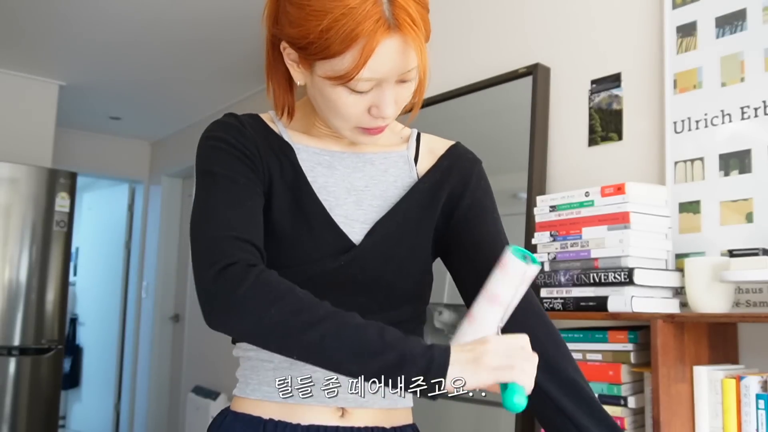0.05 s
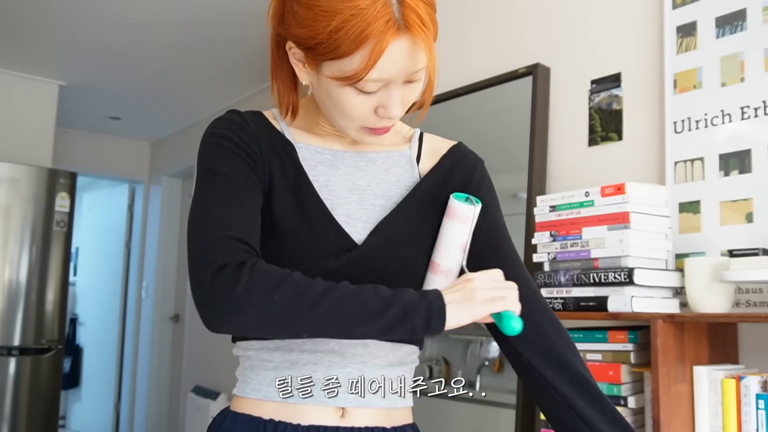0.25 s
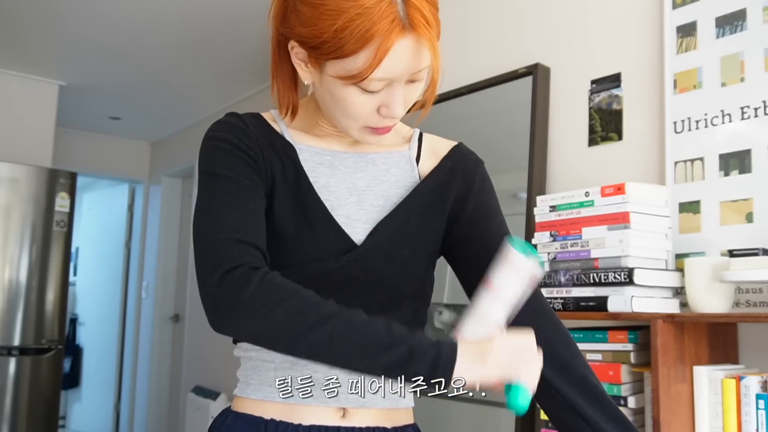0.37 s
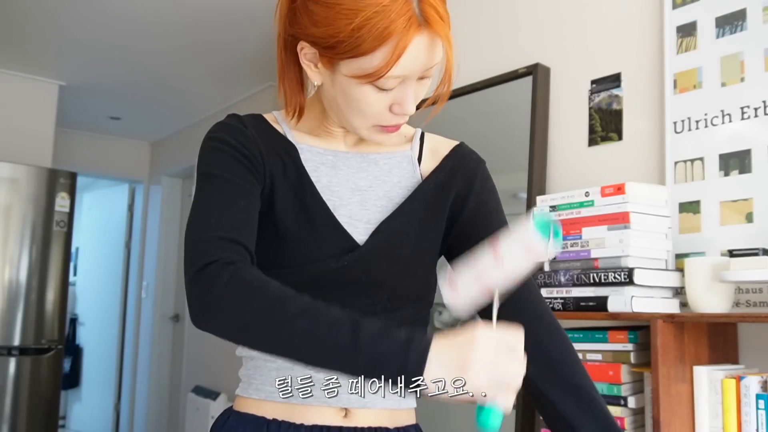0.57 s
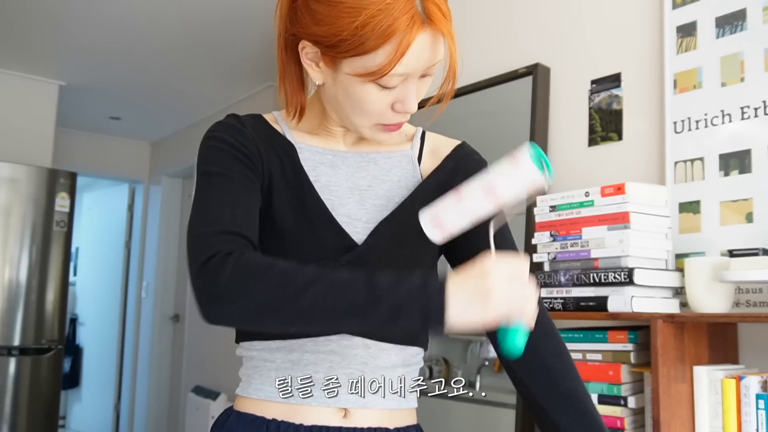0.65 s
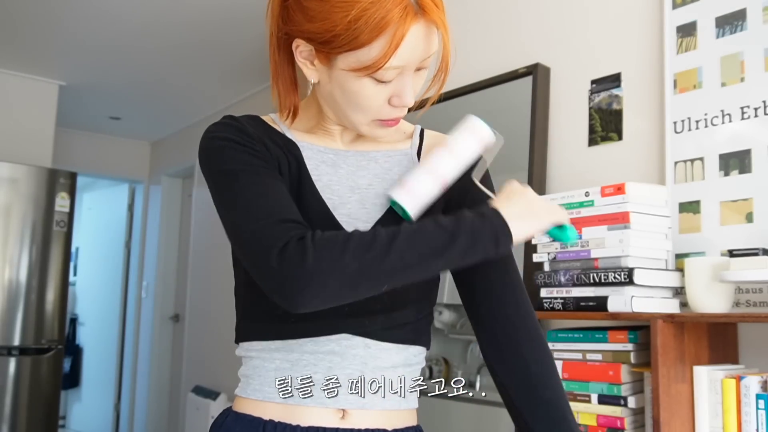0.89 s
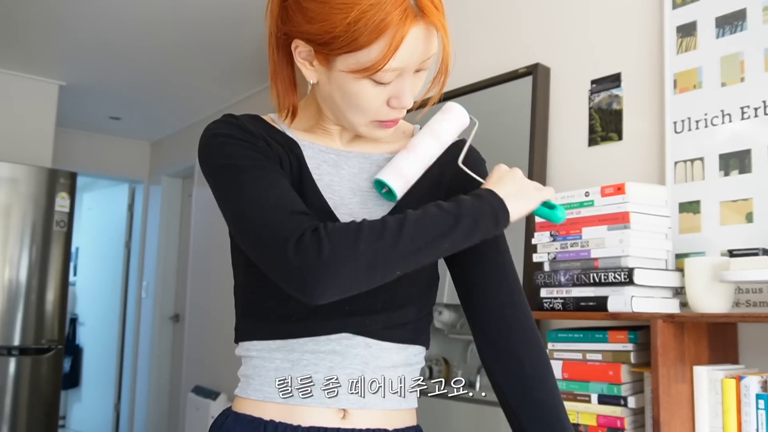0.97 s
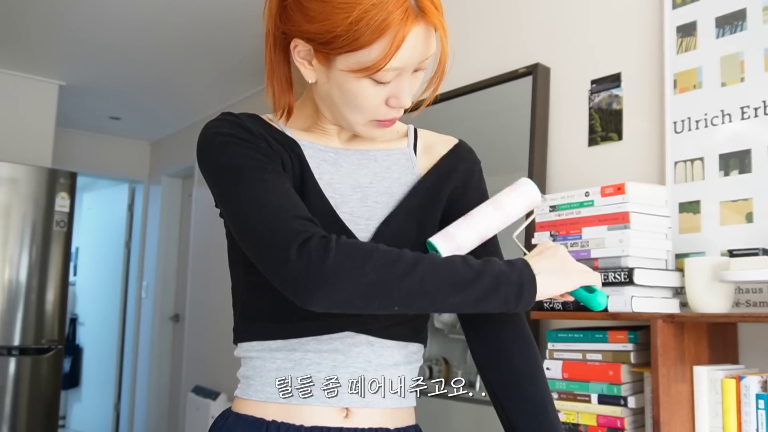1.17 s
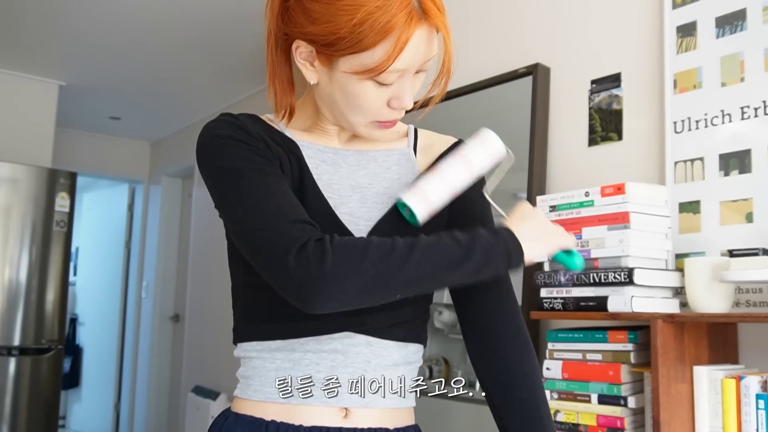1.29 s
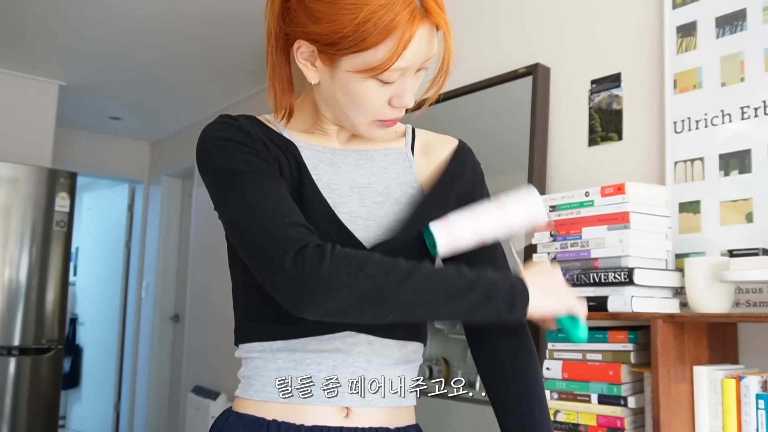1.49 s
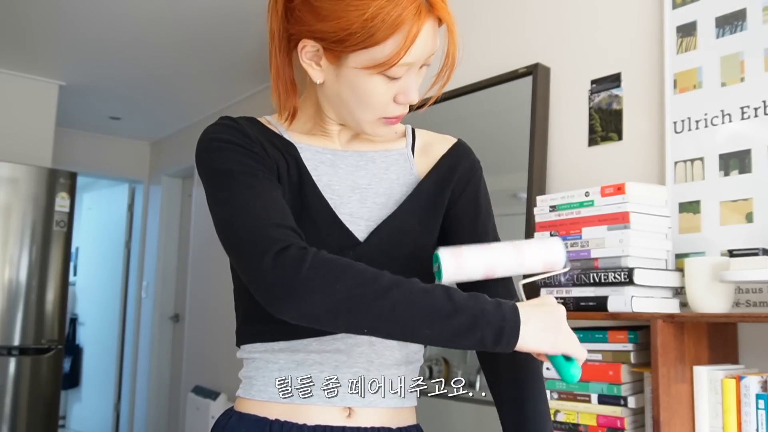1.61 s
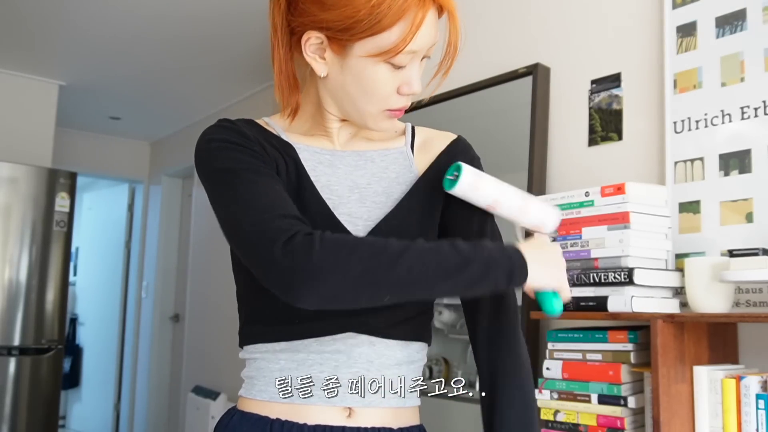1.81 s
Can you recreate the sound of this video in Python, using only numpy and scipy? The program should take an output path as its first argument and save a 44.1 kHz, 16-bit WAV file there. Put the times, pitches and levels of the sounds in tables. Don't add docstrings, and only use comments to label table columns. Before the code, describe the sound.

A lint roller strokes a knitted sleeve, its adhesive crackling softly from 0 to 0.55 seconds, with hollow knocks strongest near 0.5. A bright snap at 0.66 and a hollow landing at 0.78 are loudest, with rattling and thin wire ringing. Softer peeling strokes follow from 0.9 to 1.7, with a clack and ting around 1.35-1.4, then a snap at 1.83. Close, quiet room, low steady hum.

```python
import sys
import numpy as np
from scipy import signal
from scipy.fft import rfft, irfft
from scipy.io import wavfile
from scipy.ndimage import uniform_filter1d

SR = 44100
rng = np.random.default_rng(int(sys.argv[2]) if len(sys.argv) > 2 else 0)


def gain_from_db(level_db):
    decades = np.asarray(level_db, float) / 20
    return 10 ** decades


def waveform_to_disk(signal):
    frames = np.transpose(np.atleast_2d(signal))
    scaled = np.clip(frames, -1, 1) * 32767
    samples = np.round(scaled).astype(np.int16)
    wavfile.write(sys.argv[1], SR, samples)


N = 81585
TIME = np.arange(N) / SR
HZ = np.fft.rfftfreq(N, 1 / SR)

# frequency in Hz, likeness from 0 to 1.
SIDES_ALIKE = [(30, 0.96), (100, 0.914), (1000, 0.772), (2500, 1), (5000, 1), (7000, 0.863), (10000, 0.83),
               (15000, 0.326)]


def evened(x):
    return x / np.sqrt(np.mean(x ** 2) + 1e-20)


def read(points, hz):
    f, value = np.transpose(points)
    return np.interp(np.log(hz + 1), np.log(f + 1), value)


def swell(peak, rise, fall):
    return np.exp(-((TIME - peak) / np.where(TIME < peak, rise, fall)) ** 2)


def resonate(x, hz, width):
    r = np.exp(-np.pi * width / SR)
    gain = (1 - r * r) / 2
    return signal.lfilter([gain, 0, -gain], [1, -2 * r * np.cos(2 * np.pi * hz / SR), r * r], x)


def clicks(per_s, spread_db):
    size = gain_from_db(spread_db * np.minimum(rng.exponential(1, N), 4))
    size = size * rng.choice([-1., 1.], N)
    return evened(size * (rng.random(N) < per_s / SR))


def slow(count):
    once = uniform_filter1d(rng.standard_normal(N), count)
    return evened(uniform_filter1d(once, count))


def pair(a, b, likeness=SIDES_ALIKE):
    same = np.clip(read(likeness, HZ), -1, 1)
    mid = rfft(a) * np.sqrt((1 + same) / 2)
    side = rfft(b) * np.sqrt((1 - same) / 2)
    return irfft(np.array([mid + side, mid - side]), N)


def hum():
    # frequency in Hz, level in dB per Hz.
    hum_colour = [(15, -56), (25, -17), (211, 2), (619, -12.5), (980, -6.5), (1150, -8), (7410, -16.5),
                  (8480, -20.5), (15800, -51)]
    noise = pair(*rng.standard_normal((2, N)))
    return gain_from_db(-54.5) * evened(irfft(rfft(noise) * gain_from_db(read(hum_colour, HZ)), N))


def room(x):
    # frequency in Hz, time to fall by 60 dB in seconds.
    fading = [(200, 0.124), (1000, 0.83), (4000, 0.254), (12000, 0.95)]
    # frequency in Hz, left-right likeness of the echoes.
    echoes_alike = [(300, 0.38), (1500, 0.95), (3000, 0.47), (6000, 0.07)]
    taps = np.zeros((2, 22000))
    at = np.arange(200, 21980, 20) + rng.integers(0, 20, (2, 1089))
    np.put_along_axis(taps, at, rng.choice([-1., 1.], at.shape), 1)
    hz, t, z = signal.stft(taps, SR, nperseg=256)
    decay = gain_from_db(-60 * t / read(fading, hz)[:, None])
    tail = signal.istft(z * decay, SR, nperseg=256)[1]
    tail = tail / np.linalg.norm(tail[0])
    echoes = signal.fftconvolve(x[None], tail, axes=1)[:, :N]
    return pair(*echoes, echoes_alike)


def rubbed_power(s, held, t60):
    rub_s, damped_t60_s = 0.003, 0.05
    at = slice(round(s * SR), round((s + .3) * SR))
    since = np.maximum(TIME[at] - s, 0)
    let_go = np.maximum(since - held, 0)
    power = np.zeros(N)
    power[at] = (1 - np.exp(-since / rub_s)) ** 2 * gain_from_db(-120 * (since / t60 + let_go / damped_t60_s))
    return power


def wire():
    wire_pitches = [4582, 4535, 4662, 8020, 8185, 11580, 13270, 13600, 14640, 15700]
    # level in dB, time to fall by 60 dB in seconds, left lead in radians.
    wire_tones = [(2.5, 0.8, 0.5), (-15, 0.17, .6), (-11, 0.26, 0.87), (-2, .25, 0.92), (1, 0.52, 0.91),
                  (0, .5, 1.3), (-3, .5, 1.1), (-2, .5, 1.1), (-5, .4, 1.3), (-2, .3, 1.5)]
    # start in seconds, held for seconds, level in dB, upper tones against the lowest in dB.
    touches = [(.39, 0.061, -54, 11.5), (0.441, 0.033, -46, 3.5), (0.483, 0.008, -38.5, 0),
               (0.502, 0.0089, -55, 20.5), (0.515, 0.013, -36.5, -4), (.536, 0.021, -44.5, -1),
               (.57, 0.0406, -55, 2), (.628, 0.025, -63.5, 8.5), (0.681, .04, -55.5, 13.5),
               (.705, 0.072, -47.5, -12), (0.767, 0.0069, -32, 0.5), (0.785, 0.023, -30.5, -3.5),
               (.815, 0.03, -48, 3), (0.842, 0.033, -37, -5), (.89, 0.01, -63, 17), (.905, 0.027, -57, -6),
               (0.991, .03, -64, 17.5), (1.026, 0.018, -50.5, -0.5), (1.05, 0.07, -61, 20),
               (1.07, 0.043, -50, -2), (1.115, 0.053, -58, 17.5), (1.128, 0.0375, -44, 5.5),
               (1.152, 0.013, -47.5, 6.5), (1.163, 0.023, -34.5, -7.5), (1.19, 0.0135, -48, -6),
               (1.215, 0.039, -53, -1), (1.399, 0.062, -62, 17.5), (1.40, 0.023, -51, -7),
               (1.458, 0.0037, -48, -5), (1.477, 0.011, -48.5, 0), (1.50, .03, -61, 15),
               (1.699, 0.035, -64.5, 14), (1.735, 0.12, -79, 16)]
    # start in seconds, held for seconds, level in dB.
    hard_rubs = [
        (.50, 0.031, -54),
        (.53, .1, -58.5),
        (.685, 0.037, -69),
        (.768, .05, -49.5),
        (.82, .08, -57),
        (1.0, .04, -65),
        (1.06, 0.086, -71),
        (1.402, 0.032, -57),
        (1.44, .05, -67),
    ]
    waver_hz, waver_db, soft_db = 12, 1.5, 4
    out, sides = np.zeros((2, N)), np.array([[.5], [-.5]])
    for hz, (tone_db, t60, lead) in zip(wire_pitches, wire_tones):
        upper = hz > 6000
        rubs = [(s, held, db + upper_db * upper) for s, held, db, upper_db in touches]
        if hz > 11000:
            rubs = hard_rubs
        power = sum(gain_from_db(2 * db) * rubbed_power(s, held, t60) for s, held, db in rubs)
        drift = np.cumsum(waver_hz * hz / 4600 * slow(count=200)) / SR
        turns = hz * TIME + drift + rng.random()
        strength = np.sqrt(2 * power) * gain_from_db(tone_db - soft_db * upper + waver_db * slow(count=300))
        out += strength * np.sin(2 * np.pi * turns + lead * sides)
    return out


def end_cap():
    cap_pitches = [3885, 6750, 13500]
    # level in dB, second tone in dB, third tone in dB, time to fall by 60 dB in seconds.
    cap_levels = (-39, -7, -15, .4)
    start_s, held_s, beat_hz = 1.391, .045, 42
    db, second_db, third_db, t60 = cap_levels
    low, second, third = [np.sin(2 * np.pi * hz * TIME) for hz in cap_pitches]
    beat = 1 + .3 * np.cos(2 * np.pi * beat_hz * (TIME - start_s - .006))
    flutter = 1 + .5 * slow(count=100)
    cap = low * beat + gain_from_db(second_db) * second * flutter + gain_from_db(third_db) * third
    return gain_from_db(db) * np.sqrt(rubbed_power(start_s, held_s, t60)) * cap


def rattle():
    # peak in seconds, rise in seconds, fall in seconds, level in dB.
    spins = [
        (.49, 0.019, 0.12, -49.5),
        (0.698, 0.036, 0.015, -51),
        (0.792, 0.017, 0.041, -33.5),
        (.86, 0.0134, 0.023, -42.5),
        (1.202, 0.073, 0.027, -50.5),
        (1.358, 0.0066, 0.016, -42.5),
        (1.41, 0.032, 0.06, -52),
    ]
    # frequency in Hz, width in Hz, level in dB.
    roll_tones = [(724, 290, -4.5), (1084, 106, -8.5), (1270, 137, -1.5), (1710, 160, -2.5),
                  (1830, 370, -2.5), (2171, 170, -9), (2930, 300, -5), (5800, 370, -29.5)]
    taps = clicks(per_s=800, spread_db=3.0) + .5 * rng.standard_normal(N)
    body = sum(gain_from_db(db) * resonate(resonate(taps, hz, 4 * w), hz, w) / np.sqrt(w) for hz, w, db in roll_tones)
    return evened(body) * sum(gain_from_db(db) * swell(peak, rise, fall) for peak, rise, fall, db in spins)


def strike(hits, shell, octaves, bounce_db):
    # frequency in Hz, width in Hz, level in dB.
    arm_tones = [(227, 230, 0.5), (406, 223, 3), (530, 450, 3)]
    bounce_s, shiver_t60_s = 0.0034, 0.3
    out, t = np.zeros(N), np.arange(12000) / SR
    tap = 1. * (t == 0)
    thud = sum(gain_from_db(d) * evened(resonate(resonate(tap, f, w), f, w)) for f, w, d in arm_tones)
    thud = thud / abs(thud).max()
    later = np.maximum(t - bounce_s, 0)
    bounce = (later / 0.00205) * np.exp(1 - later / 0.00085) + 2.1 * np.exp(-t / 0.0025)
    for s, db, hz, thud_db, shiver_db in hits:
        tick = np.exp(-t / 0.000086) * np.cos(2 * np.pi * hz * t)
        shiver = gain_from_db(shiver_db - 60 * t / shiver_t60_s)
        blow = tick + rng.standard_normal(len(t)) * (gain_from_db(bounce_db) * bounce + shiver)
        ring = np.zeros(len(t))
        for k, (f, w, d) in enumerate(shell):
            strength = gain_from_db(d - 4.0 * (np.log2(f / hz) / octaves) ** 2) / np.sqrt(w)
            ring += (-1) ** k * strength * resonate(resonate(blow, f, 2 * w), f, w)
        ring = ring / abs(ring).max() + gain_from_db(thud_db) * thud
        part = out[round(s * SR):][:len(t)]
        part += gain_from_db(db) * ring[:len(part)]
    return out


def axle_knocks():
    # start in seconds, peak in dB, tone in Hz, thud in dB, shiver in dB.
    axle_hits = [(0.0602, -37, 1880, -9, -40), (.229, -33.5, 1830, -13, -21), (0.325, -30, 1650, -16, -18),
                 (0.4584, -30.5, 1890, -11.5, -22), (0.4731, -23, 1730, -12.5, -13),
                 (0.5, -23.5, 2120, -23, -25), (.518, -33, 2070, -25, -37), (.535, -38, 1900, -17, -30),
                 (.565, -36, 1900, -19, -19), (.585, -39, 2040, -5.5, -15), (1.399, -38, 4930, -27, -24.5),
                 (1.543, -34.5, 1500, -23, -26)]
    # frequency in Hz, width in Hz, level in dB.
    struck_tones = [(735, 114, -12), (1220, 900, 2), (1855, 510, 2.5), (2660, 1230, 4), (3560, 240, -6),
                    (4020, 580, -3.5), (4710, 380, 14.5), (5160, 380, -12), (6200, 2000, 7),
                    (8900, 2800, 11)]
    return strike(axle_hits, struck_tones, octaves=0.68, bounce_db=-16)


def arm_landings():
    # start in seconds, peak in dB, tone in Hz, thud in dB, shiver in dB.
    arm_hits = [
        (.7715, -27, 2000, -30, -33.5),
        (.7763, -9.5, 2430, -14, -24.5),
        (.7822, -16, 2800, -21, -33),
        (.7865, -25.5, 1990, -42.5, -23.5),
        (.8245, -28, 1670, -43, -22),
        (1.3454, -25.5, 1390, -7.5, -20),
        (1.3505, -29, 1910, -40, -26),
    ]
    # frequency in Hz, width in Hz, level in dB.
    pressed_tones = [(734, 120, 1), (1093, 175, 3.5), (1380, 350, 1), (1820, 120, 1), (2170, 370, -1),
                     (2800, 290, -2.5), (2950, 350, 1.5), (3240, 320, -1.5), (4470, 580, 6), (6060, 600, 6),
                     (8800, 2800, 10.5)]
    return strike(arm_hits, pressed_tones, octaves=1.1, bounce_db=-32)


def stop_snaps():
    # start in seconds, peak in dB, tone in Hz, thud in dB, shiver in dB.
    stop_hits = [
        (.6622, -9, 3780, -27, -27),
        (.6672, -18.5, 3440, -36, -27),
        (.6695, -24, 2670, -50, -42),
        (.6752, -21, 5100, -54, -23),
        (1.3452, -22.5, 4530, -36, -28),
        (1.8327, -23.5, 3560, -24, -22),
        (1.8364, -30.5, 3400, -36, -13),
        (1.8378, -30, 3900, -29.5, -38),
        (1.8472, -40, 3400, -50, -30),
    ]
    # frequency in Hz, width in Hz, level in dB.
    stop_tones = [(1460, 640, 4), (2170, 260, -4), (2650, 360, 3.5), (3520, 370, -2), (3900, 244, -0.5),
                  (4514, 510, 3), (5470, 260, -1), (6180, 350, -3.5), (6960, 310, -5), (7710, 530, -2),
                  (8540, 690, -7), (10600, 3800, -2.5)]
    return strike(stop_hits, stop_tones, octaves=1.1, bounce_db=-32)


def peel():
    # peak in seconds, rise in seconds, fall in seconds, level in dB, brightness in dB per octave.
    strokes = [(0.059, 0.063, 0.032, -43, 2), (0.11, 0.0317, 0.0541, -45, 2.5),
               (.232, 0.0388, 0.035, -39.5, 2), (.28, 0.023, 0.035, -44.5, 1),
               (.40, 0.051, 0.042, -42.5, 1), (.465, 0.058, 0.078, -39.5, 3.5),
               (.96, 0.11, 0.081, -49.5, 1), (1.096, 0.037, 0.041, -44.5, 0.5),
               (1.166, 0.021, 0.041, -37.5, 5), (1.321, 0.054, 0.07, -47, 1.5),
               (1.40, 0.0068, 0.019, -52, 7), (1.518, 0.012, 0.018, -37, 7.5),
               (1.579, 0.095, 0.051, -41.5, 1.5), (1.669, 0.034, 0.037, -45.5, 1.5)]
    # frequency in Hz, level in dB per Hz.
    peel_colour = [(180, -63), (300, -5), (602, -1.5), (676, -4.5), (853, -11), (1060, -4.5), (1680, -1.5),
                   (4860, 0.5), (15800, -20.5)]
    a, b = [clicks(per_s=7000, spread_db=2.2) + rng.standard_normal(N) for _ in "ab"]
    crackle = rfft(pair(a, b)) * gain_from_db(read(peel_colour, HZ))
    out = np.zeros((2, N))
    for peak, rise, fall, db, tilt_db in strokes:
        brightness = gain_from_db(tilt_db * np.log2((HZ + 100) / 4000))
        out += gain_from_db(db) * swell(peak, rise, fall) * evened(irfft(crackle * brightness, N))
    return out


def scene():
    sheet, steel, snaps = peel(), wire() + end_cap(), stop_snaps()
    roll = rattle() + axle_knocks() + snaps + arm_landings()
    wet = room(gain_from_db(-9) * roll + gain_from_db(-9.5) * sheet.mean(0) + gain_from_db(-5.5) * steel.mean(0))
    sides = np.array([[1.], [-1.]])
    late = .5 * 0.53 * sides * np.gradient(snaps)
    near = sheet + roll + late + wet + hum()
    return near * gain_from_db(0.32 * sides) + steel * gain_from_db(0.5 * sides)


def roll_off(x):
    return signal.sosfilt(signal.butter(12, 15920, fs=SR, output="sos"), x)


def record(dry):
    edge = signal.firwin(255, 15820, window=("kaiser", 9), fs=SR)
    mix = signal.oaconvolve(dry, edge[None], "same")
    return roll_off(mix)


dry = scene()
out = record(dry)
waveform_to_disk(out)
```